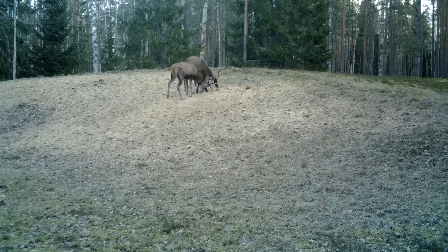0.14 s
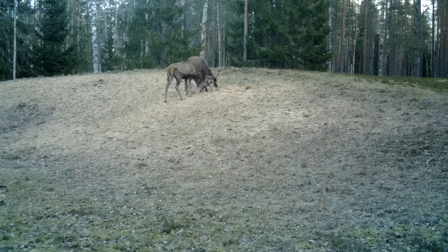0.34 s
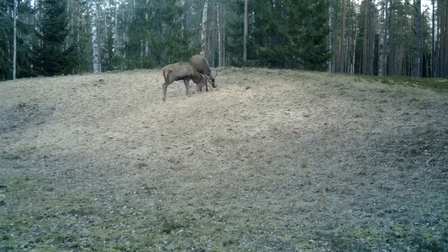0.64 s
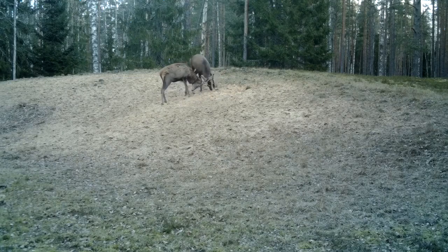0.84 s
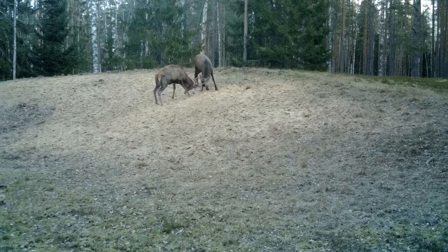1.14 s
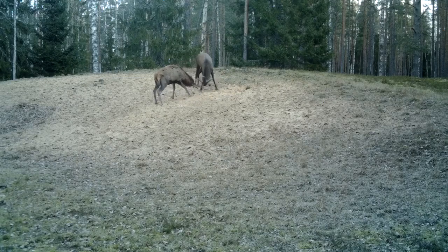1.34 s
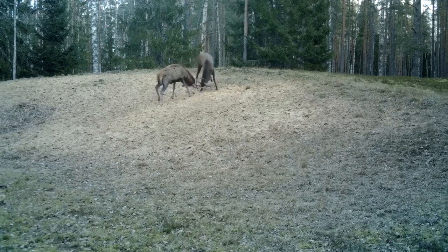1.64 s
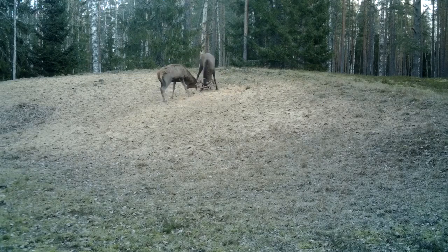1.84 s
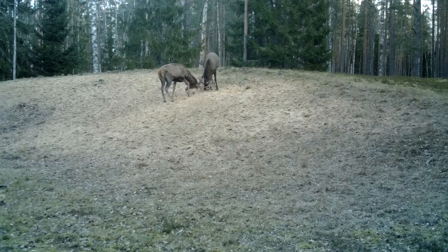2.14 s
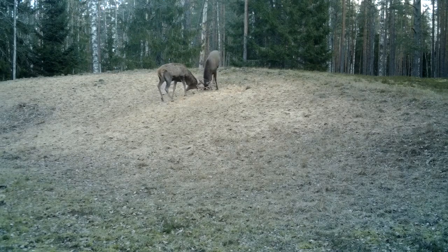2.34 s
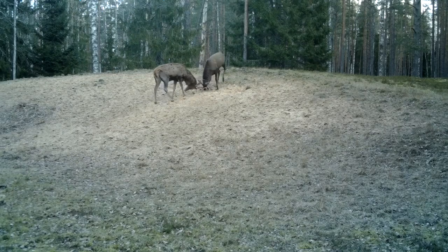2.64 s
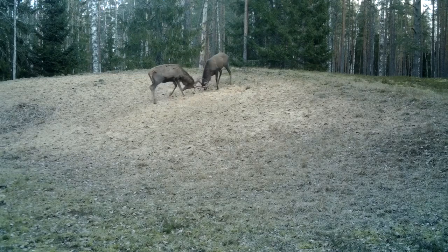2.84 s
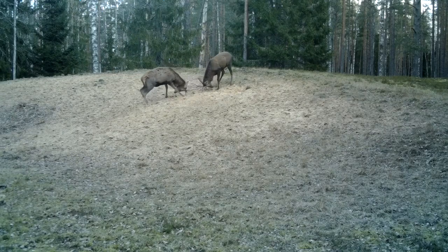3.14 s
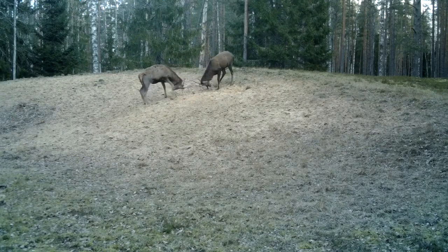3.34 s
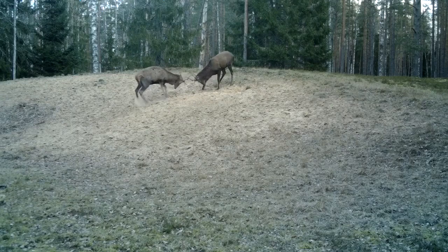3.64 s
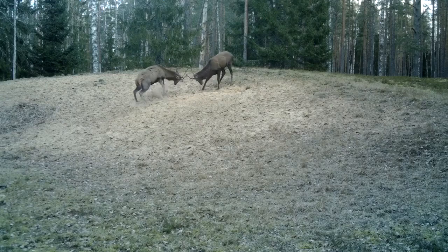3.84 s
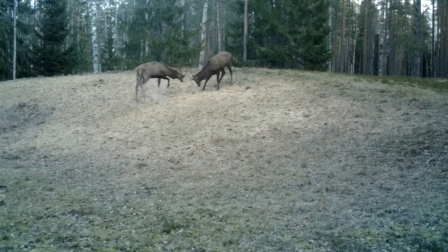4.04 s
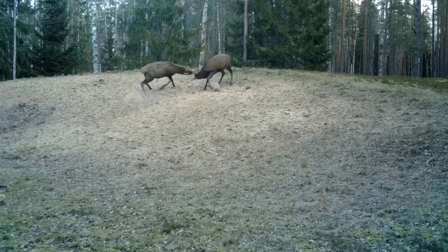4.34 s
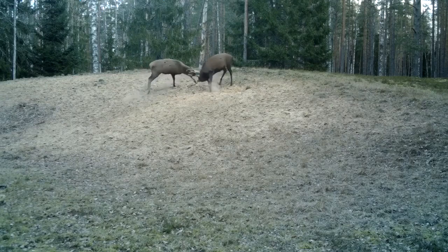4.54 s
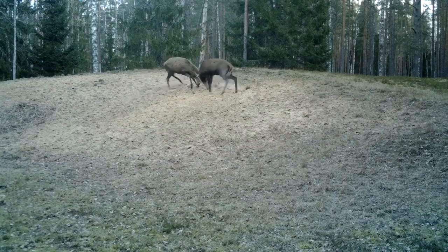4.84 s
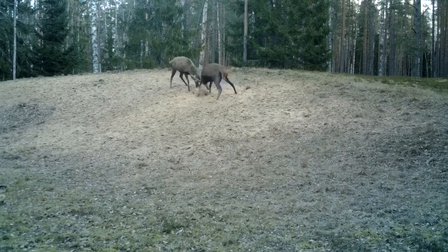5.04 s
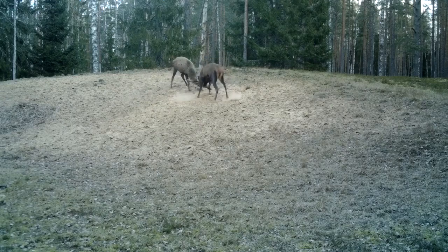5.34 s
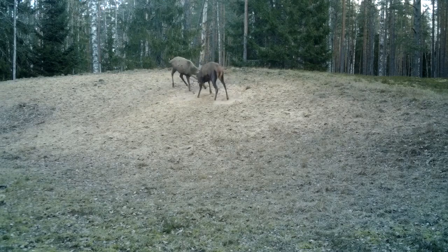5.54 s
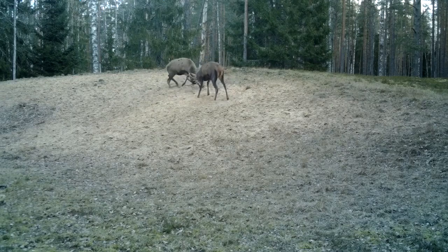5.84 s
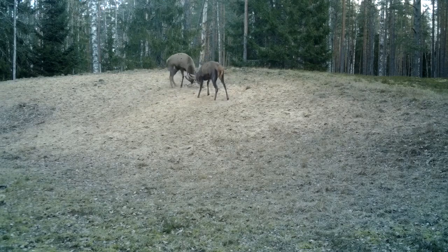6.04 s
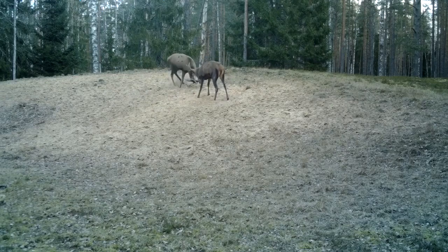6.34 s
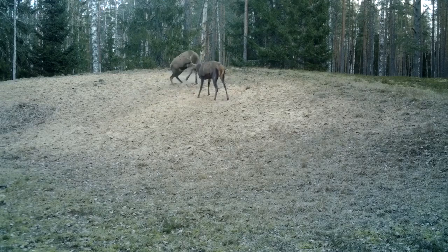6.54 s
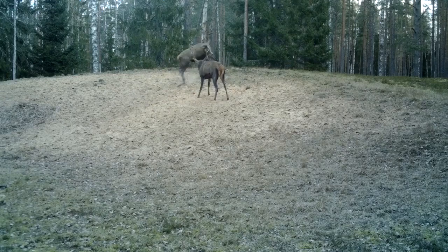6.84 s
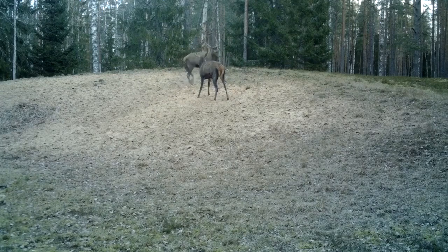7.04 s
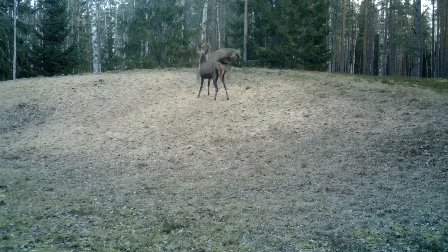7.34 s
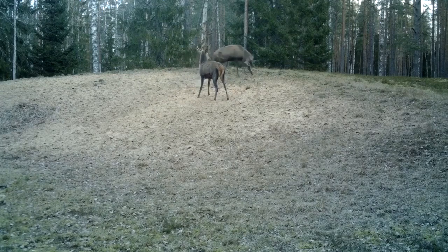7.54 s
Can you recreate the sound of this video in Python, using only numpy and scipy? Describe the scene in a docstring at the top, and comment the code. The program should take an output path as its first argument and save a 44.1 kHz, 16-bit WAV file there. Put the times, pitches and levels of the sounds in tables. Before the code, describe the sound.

A distant, quiet single-microphone scene: hollow, dry antler knocks, skids and brief grinding rattles arrive in four or five irregular clusters, each leaving a faint diffuse wash from the trees. One stag grunts shortly before the first cluster. Soft low hoof thumps and crackly grass scuffs accompany the struggle and continue after it, with tiny high bird calls over gusty rumble and microphone hiss.

```python
"""Antler tines knock and skid, hooves thud and scuff dry grass, one stag grunts and a small bird calls.
Two stags spar on a grassy knoll, some twenty metres from an unattended camera at the edge of a pine forest.
Bursts of tiny impacts ring damped bone modes; thuds are damped sines, scuffs are bands of crackly noise.
The grunt is pulses through throat resonances, the bird gliding blurred tones.
The trunks return a short noise wash over wind rumble and microphone hiss."""
import sys
import numpy as np
from scipy import signal
from scipy.fft import rfft, irfft
from scipy.io import wavfile
from scipy.ndimage import uniform_filter1d

SR = 44100
rng = np.random.default_rng(int(sys.argv[2]) if len(sys.argv) > 2 else 0)


def file_out(sig):
    """Save sig as 16-bit WAV at sys.argv[1]."""
    # one column per channel
    cols = np.atleast_2d(sig).T
    # limit, then scale
    lim = np.clip(cols, -1, 1)
    pcm = np.round(lim * 32767).astype(np.int16)
    wavfile.write(sys.argv[1], SR, pcm)


N = 339129

# bird calls from the trees: (time [s], length [s], first pitch [Hz], last pitch [Hz], starting level [dB])
BIRD_CALLS = [(0, .2, 3820, 3620, -59.5), (6.092, 0.049, 3720, 3770, -65), (6.135, .17, 7900, 8000, -59.5),
              (6.35, .08, 5000, 5130, -62), (7.09, 0.058, 3780, 3800, -63)]
BIRD_ATTACK_S, BIRD_FADE_DB = .015, -9

# spectrum of wind rumble and microphone hiss: (frequency [Hz], relative density [dB per Hz])
AIR_SPECTRUM = [(8.8, -37), (15, 3), (32, 0), (54, -4), (190, -12), (442, -19), (770, -21.5), (944, -24.5),
                (1690, -27), (3720, -31.5), (4060, -31.5), (14700, -36.5), (16000, -39)]
AIR_DB = -46  # rms

# resonances of the stag's throat, each passed twice:
# (centre [Hz], width of one pass [Hz], relative starting level [dB], gain by the end as the mouth changes [dB])
THROAT = [(105, 100, 11, -2.5), (1160, 300, -3, 6), (1780, 650, 3.5, -8), (2180, 280, -3.5, 5),
          (2880, 400, -2, -8), (3700, 200, -15.5, 20)]
GRUNT_S, GRUNT_ATTACK_S, GRUNT_HOLD_S, GRUNT_RELEASE_S = .9, .1, .1, .05
GRUNT_DB = -50  # rms of the voice before it is faded in and out
GRUNT_HZ, GRUNT_SAG_HZ_PER_S2 = 109.6, 300  # the pulse rate sags ever faster

# antlers striking: (time [s], peak level before the bass cut [dB], ring of the struck tine [Hz],
# beam share [dB], tip share [dB], skid length [ms])
CLACKS = [(1.201, -33.5, 3450, 0, -7, 2.1), (1.2519, -26, 1630, -21, -5.5, 1.3),
          (1.2871, -17, 1670, 3, -12, 2.87), (1.3272, -35.5, 1553, -8, -11, 2.6),
          (1.387, -26, 5100, -5.5, -4.5, 0.22), (1.5246, -19, 2430, -8, -11.5, 0.76),
          (1.5332, -27.5, 1510, -15, -15, 3.8), (1.5769, -31, 2250, -7, -24, 3.5),
          (1.6155, -39, 1574, 2.5, -11, 0.11), (3.0216, -31, 2090, -5, -2, 0.71),
          (3.0558, -37.5, 2350, -2.5, -19, 2), (3.1022, -36, 2077, -11, -9.5, 4),
          (3.1113, -32.5, 3100, 1.5, -9, 2.9), (3.1536, -15.5, 2780, 0, -4, 1.23),
          (3.1762, -44, 2702, 0, -10.5, .41), (3.2133, -38.5, 3740, -10, 0, 4),
          (3.424, -14, 2610, -11.5, -3, 3.2), (3.4612, -35, 2146, -10, -13.5, 0.49),
          (3.4844, -34, 3600, -4, -5.5, 0.61), (3.501, -43.5, 2079, -14, 0, 2.2),
          (3.5532, -11, 4150, -7.5, -10, 0.16), (3.5554, -18.5, 3370, -6, -4, 0.14),
          (3.565, -25, 2259, -21, -9, 1.9), (3.574, -38, 2660, -12, -20, 2.1),
          (3.6068, -19.5, 2680, -12, -9.5, 1.6), (3.636, -24.5, 1800, 0, -20, 1.92),
          (3.6528, -27, 1880, 0, -3.5, 2.95), (4.0517, -18, 3200, -3.5, 5.5, 4.97),
          (4.0852, -35, 2400, -3, -18, 0.67), (4.1037, -32.5, 3350, -4, -12, 0.21),
          (4.3438, -29.5, 6200, -8, -0.5, 0.3), (4.3528, -36, 3660, -15, -11, 2.8),
          (4.37, -38, 4068, -9, -5, 8.1), (4.3872, -32, 5020, -2, -10, 0.43),
          (4.4949, -32, 1350, 4, -15, 1.32), (4.594, -32, 2690, 5, -3, 1.3),
          (4.6273, -32, 3334, 5.5, -9, 2.4), (4.6402, -36, 1500, 6, -11, 0.6),
          (4.665, -24.5, 2480, -7, -10.5, 0.37), (4.6919, -21, 5830, -7.5, -1.5, 1.33),
          (4.7262, -28, 2400, 4.5, -2, 2.4), (4.7319, -29.5, 3000, -2, 0, 2.2),
          (4.7534, -40, 2365, -2, -6, 1.86), (4.801, -10.5, 2450, -1, -8.5, 4.73),
          (4.8202, -26, 1210, -11, -7, 2.1), (4.8326, -33, 3240, -4, -4, 1), (4.839, -35, 1080, 12, 10, 13),
          (4.8457, -23, 2930, -18, -9.5, 0.33), (4.8602, -25.5, 1260, 6, -13, 5.6),
          (4.8774, -34.5, 1870, -10, -16, 5.5), (5.2009, -27.5, 2420, 1, -17, 2.2),
          (5.2151, -26.5, 1339, -16, -20, 1.18), (5.269, -37, 5046, -6, -12.5, 0.94),
          (5.2778, -24.5, 3387, -3, -11, 0.68), (5.2852, -23.5, 2370, 3, -6.5, 3.66),
          (5.3216, -20, 5240, -25, -2, 0.61), (5.3887, -35.5, 1270, 6, -10, 1.7)]
# modes of the antlers in three lists, thick beam, shafts, thin tips: (frequency [Hz], relative level [dB])
ANTLER_MODES = [
    [(470, -1), (700, -5.5), (1150, 0.5), (1450, 3.5), (1770, -4)],
    [(2150, -1.5), (2500, 2.5), (3000, -1), (3460, 1), (3940, -2.5), (4350, -0.5), (4800, -4)],
    [(5400, -1), (6090, 4), (7000, 1), (8000, -2.5), (8800, -1.5), (9800, 0.5), (11000, -4), (12500, -10.5),
     (14200, -14)],
]
# ring times of a clack, one each for beam, shafts and tips: (t60 [s])
RING_T60_S = [.02, .009, .004]
TINE_DB, TINE_T60_S = 1.5, .012
SKID_FADE_DB = -8  # over a full skid: early impacts tend to be the hardest
CHATTER_DB, CHATTER_T60_S = -6, 0.028
GROUND_S, GROUND_DB = .0023, -12  # delay and level of the bounce off the ground
THIN_HZ = 1003  # bass cut of slender bone

# locked antlers grinding between the clacks:
# (centre time [s], rms level before the fades [dB], fade length either side [s])
RATTLES = [(1.275, -47.5, 0.048), (1.323, -57, 0.0159), (1.518, -55, 0.026), (1.557, -45.5, 0.055),
           (3.086, -50, 0.091), (3.183, -47.5, 0.062), (3.47, -54, 0.022), (3.599, -55, 0.0098),
           (3.63, -53, 0.05384), (4.088, -48.5, 0.046), (4.361, -48.5, 0.033), (4.636, -48.5, 0.045),
           (4.723, -47.5, 0.07), (4.828, -40, 0.066), (4.885, -48.5, 0.043), (5.215, -47, 0.055),
           (5.281, -44.5, 0.05)]
# faint chance ticks in every rattle: level over the rattle, half its spread, beam and tip shares, skid
TICK_DB, TICK_SPREAD_DB = 1.5, 3
TICK_BEAM_DB, TICK_TIP_DB, TICK_SKID_MS = -4, -4, 2.3

# the wash from the trunks by band: (low edge [Hz], high edge [Hz], level [dB], t60 [s])
FOREST_WASH = [(910, 2370, -17, 0.66), (1900, 5100, -18.5, 0.77), (5170, 9800, -20, 0.7057),
               (8990, 9030, -29, .25)]
NEAR_DB, NEAR_T60_S = -8, .06  # early part of the wash, against the late part

# hooves scuffing dry grass:
# (centre time [s], rms level before the fades [dB], centre frequency [Hz], fade length either side [s])
SCUFFS = [(2.117, -59, 2995, .07), (2.656, -59, 3002, 0.061), (2.798, -55.5, 9000, .058),
          (2.992, -52.5, 2496, 0.028), (3.4, -52.5, 3004, .047), (3.891, -53, 2270, 0.17),
          (4.308, -52.5, 3027, .025), (4.43, -55, 3996, 0.033), (5.036, -55, 2360, 0.26),
          (5.167, -51, 4860, .0085), (5.848, -46.5, 2520, 0.0034), (5.886, -51, 4500, .005),
          (6.203, -58.5, 2502, 0.14), (7.142, -52, 5990, 0.027), (7.233, -54.5, 7000, 0.047),
          (7.417, -54, 2477, 0.014), (7.432, -50.5, 10000, 0.018), (7.576, -54, 1700, 0.01),
          (7.669, -53, 5500, 0.032)]

# hooves landing: (time [s], level before attack and decay [dB], frequency [Hz])
THUDS = [(3.671, -35, 81), (4.065, -32, 132), (4.731, -33, 123), (4.81, -24.5, 109), (4.916, -27, 69.4),
         (4.97, -33.5, 91), (5.286, -32, 55), (6.175, -34.5, 71), (7.139, -30, 75), (7.24, -30.5, 60),
         (7.377, -30.5, 60), (7.612, -33, 60), (7.669, -27.5, 45)]
THUD_ATTACK_S, THUD_T60_S = 0.0025, 0.069

TOP_HZ = 15800  # upper limit of the camera


def undb(db):
    """Gain of a level in dB."""
    return 10 ** (np.asarray(db) / 20)


def unit(x):
    """Scaled to rms 1."""
    return x / np.sqrt(np.mean(x ** 2))


def band(x, hz, width_hz):
    """Resonance with gain 1 at its centre."""
    return signal.lfilter(*signal.iirpeak(hz, hz / width_hz, SR), x)


def ring(hz, t60, t):
    """Damped sine, down 60 dB after t60 seconds."""
    return np.sin(2 * np.pi * hz * t) * np.exp(-np.log(1000) * t / t60)


def add(out, s, x):
    """Mixes x in at time s."""
    i = int(s * SR)
    out[i:i + len(x)] += x[:N - i]


def walk(rate):
    """Random levels held 1 / rate s and slewed twice; spread near 1."""
    hold = int(SR / rate)
    steps = np.repeat(rng.standard_normal(N // hold + 1), hold)
    return 1.6 * uniform_filter1d(uniform_filter1d(steps, hold), hold)[:N]


def swell(table, grains):
    """Grains faded in and out around each row's time, in a band if the row names a frequency."""
    out, time = np.zeros(N), np.arange(N) / SR
    for s, db, length, *hz in table:
        near = np.abs(time - s) < length
        part = band(grains[near], hz[0], 0.95 * hz[0]) if hz else grains[near]
        fade = np.cos(np.pi / 2 * (time[near] - s) / length) ** 2
        out[near] += undb(db) * unit(part) * fade
    return out


def bird():
    """Thin fading calls from the trees, gliding tones blurred by the many paths between the trunks."""
    out, time = np.zeros(N), np.arange(N) / SR
    warble = walk(45)
    blur = walk(800) + 1j * walk(800)
    for s, length, first_hz, last_hz, db in BIRD_CALLS:
        done = np.clip((time - s) / length, 0, 1)
        hz = first_hz + (last_hz - first_hz) * done
        cycles = np.cumsum(hz * (1 + .012 * warble)) / SR
        tone = np.real(blur * np.exp(2j * np.pi * cycles))
        attack = np.minimum(done * length / BIRD_ATTACK_S, 1)
        out += undb(db + BIRD_FADE_DB * done) * attack * (done < 1) * tone
    return out


def air():
    """Wind rumble and microphone hiss as coloured noise; the bass swells with the gusts."""
    f = np.maximum(np.arange(N // 2 + 1) * SR / N, 1)
    table_hz, table_db = np.array(AIR_SPECTRUM).T
    colour = undb(np.interp(np.log(f), np.log(table_hz), table_db))
    noise = rfft(rng.standard_normal(N)) * colour
    gusty = 1 / (1 + (f / 150) ** 2)  # share of each frequency that follows the gusts
    steady = irfft(noise * (1 - gusty), N)
    wind = irfft(noise * gusty, N)
    return undb(AIR_DB) * unit(steady + wind * undb(walk(3.11)))


def grunt():
    """Uneven glottal pulses, each with a puff of air, through the throat."""
    t = np.arange(N) / SR - GRUNT_S
    end = GRUNT_ATTACK_S + GRUNT_HOLD_S + GRUNT_RELEASE_S
    effort = np.clip(np.minimum(t / GRUNT_ATTACK_S, (end - t) / GRUNT_RELEASE_S), 0, 1)
    hz = GRUNT_HZ - GRUNT_SAG_HZ_PER_S2 * np.clip(t, 0, end) ** 2
    phase = np.cumsum(hz * (1 + .012 * walk(60))) / SR
    # one pulse at the start of each cycle
    beats = np.diff(np.floor(phase), prepend=0) * undb(1.4 * walk(99.098))
    puffs = undb(-25) * rng.standard_normal(N) * np.exp(-(phase % 1) / .2)
    source = beats + puffs
    done = np.clip(t / end, 0, 1)
    voice = np.zeros(N)
    for centre_hz, width_hz, db, gain_db in THROAT:
        resonance = band(band(source, centre_hz, width_hz), centre_hz, width_hz)
        voice += undb(db + gain_db * done) * resonance
    return undb(GRUNT_DB) * unit(voice) * effort


def ticks(count=3):
    """Rows for the faint clacks that chance strews over each rattle."""
    when, size, tine = rng.random((len(RATTLES), count, 3)).T
    s, db, length = np.transpose(RATTLES)
    modes_hz = np.concatenate(ANTLER_MODES[:2])[2:, 0]  # upper beam and shafts
    tick_s = s + length * (2 * when - 1) / 2
    tick_db = db + TICK_DB + TICK_SPREAD_DB * (2 * size - 1)
    tine_hz = modes_hz[(tine * len(modes_hz)).astype(int)]
    rows = zip(tick_s.ravel(), tick_db.ravel(), tine_hz.ravel())
    return [(*row, TICK_BEAM_DB, TICK_TIP_DB, TICK_SKID_MS) for row in rows]


def antlers(count=14):
    """Each clack is a skid of tiny impacts, then a dying chatter; both ring the heavily damped bone."""
    out, t = np.zeros(N), np.arange(SR // 30) / SR
    rows = CLACKS + ticks()
    when, size = rng.random((len(rows), count)), rng.standard_normal((len(rows), count))
    chatter = rng.standard_normal((len(rows), len(t))) ** 3
    grip = rng.standard_normal((len(rows), len(ANTLER_MODES), 2, 9, 1))
    for k, (s, level_db, tine_hz, beam_db, tip_db, skid_ms) in enumerate(rows):
        skid = skid_ms / 1000
        knocks = np.zeros(len(t))
        lag = skid * SR * (when[k] - when[k].min())
        force = np.sign(size[k]) * (1.2 + np.abs(size[k])) * undb(SKID_FADE_DB * when[k])
        np.add.at(knocks, lag.astype(int), force)
        loose = chatter[k] * np.exp(-np.log(1000) * np.maximum(t - skid, 0) / CHATTER_T60_S)
        knocks = unit(knocks) + undb(CHATTER_DB) * unit(loose)
        # the same knocks arrive again off the ground
        knocks = knocks + undb(GROUND_DB) * np.roll(knocks, int(GROUND_S * SR))
        clack = undb(TINE_DB) * unit(signal.fftconvolve(knocks, ring(tine_hz, TINE_T60_S, t)))
        shares_db = (beam_db, 0, tip_db)
        for part, t60, hold, share_db in zip(ANTLER_MODES, RING_T60_S, grip[k], shares_db):
            hz, db = np.array(part).T[:, :, None]
            # a harder contact reaches the highest modes better
            db = db + 0.45 * tip_db * np.log2(np.maximum(hz / 5400, 1))
            # every grip sounds the modes a little differently; neighbours swing in opposite phase
            level_shift_db, pitch_shift = 0.87 * hold[0, :len(part)], 0.062 * hold[1, :len(part)]
            swing = (-1.) ** np.arange(len(part))[:, None] * undb(db + level_shift_db)
            body = np.sum(swing * ring(hz * (1 + pitch_shift), t60, t), axis=0)
            clack = clack + undb(share_db) * unit(signal.fftconvolve(knocks, body))
        top = np.sqrt(uniform_filter1d(clack ** 2, SR // 1000).max())  # loudest millisecond
        add(out, s, undb(level_db) * clack / top)
    # slender bone radiates little bass
    return signal.sosfilt(signal.butter(2, THIN_HZ, "high", fs=SR, output="sos"), out)


def rattle():
    """Dense uneven slips of bone on bone, ringing the same antlers for half as long."""
    t = np.arange(SR // 50) / SR
    slips = rng.standard_normal(N) * undb(5.7 * rng.standard_normal(N))
    body = np.zeros(len(t))
    for part, t60, share_db in zip(ANTLER_MODES, RING_T60_S, (-6, 0, -1.5)):
        for k, (hz, db) in enumerate(part):
            body += (-1) ** k * undb(db + share_db) * ring(hz, t60 / 2, t)
    return swell(RATTLES, signal.fftconvolve(slips, body)[:N])


def forest(x):
    """Echoes leave the antlers in all directions, so only a clack's broad colour survives in the wash."""
    out, t = np.zeros(N), np.arange(SR) / SR
    for lo_hz, hi_hz, db, t60 in FOREST_WASH:
        sos = signal.butter(2, [lo_hz, hi_hz], "band", fs=SR, output="sos")
        # decays of power, hence the doubled exponents and dB
        near = np.exp(-2 * np.log(1000) * t / NEAR_T60_S)
        far = np.exp(-2 * np.log(1000) * t / t60) * np.minimum(t / 0.028, 1)
        spread = undb(2 * db) * (undb(2 * NEAR_DB) * near / near.sum() + far / far.sum())
        power = signal.fftconvolve(signal.sosfilt(sos, x) ** 2, spread)[:N]
        noise = unit(signal.sosfilt(sos, rng.standard_normal(N)))
        out += np.sqrt(np.maximum(power, 0)) * noise
    return out


def scuffs():
    """Hooves brushing dry stalks: crackly noise of very uneven grains, in a band for each scuff."""
    stalks = rng.standard_normal(N) * undb(9.2 * rng.standard_normal(N))
    return swell([(s, db, length, hz) for s, db, hz, length in SCUFFS], stalks)


def thuds():
    """Hooves landing on soil: soft low damped sines."""
    out, t = np.zeros(N), np.arange(SR // 4) / SR
    for s, db, hz in THUDS:
        attack = np.minimum(t / THUD_ATTACK_S, 1)
        add(out, s, undb(db) * ring(hz, THUD_T60_S, t) * attack)
    return out


def scene():
    """Everything as it reaches the microphone."""
    bone = antlers() + rattle()
    hooves = thuds() + scuffs()
    return (bone + forest(bone) + hooves + grunt() + bird() + air())[None]


def record(dry):
    """The camera cuts the top with a steep low-pass."""
    return signal.sosfilt(signal.ellip(10, .2, 65, TOP_HZ, fs=SR, output="sos"), dry)


dry = scene()
out = record(dry)
file_out(out)
```